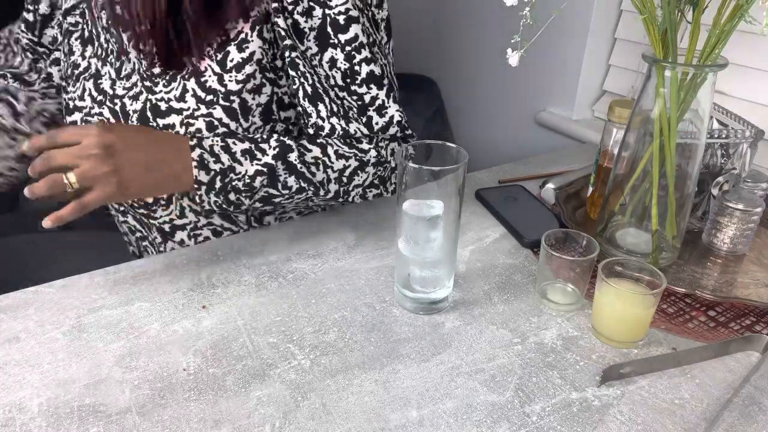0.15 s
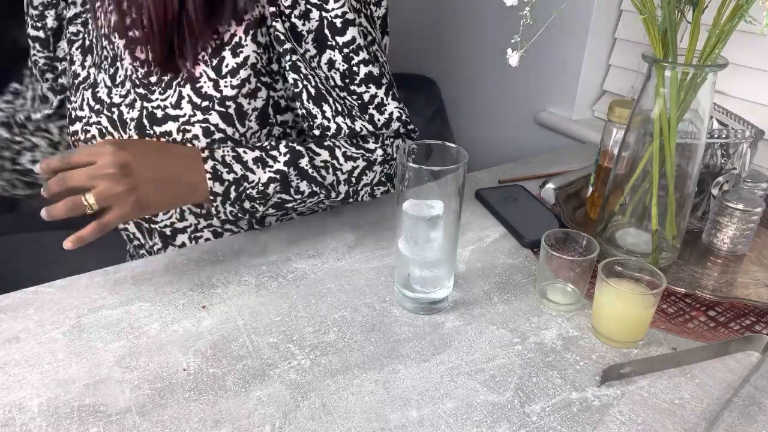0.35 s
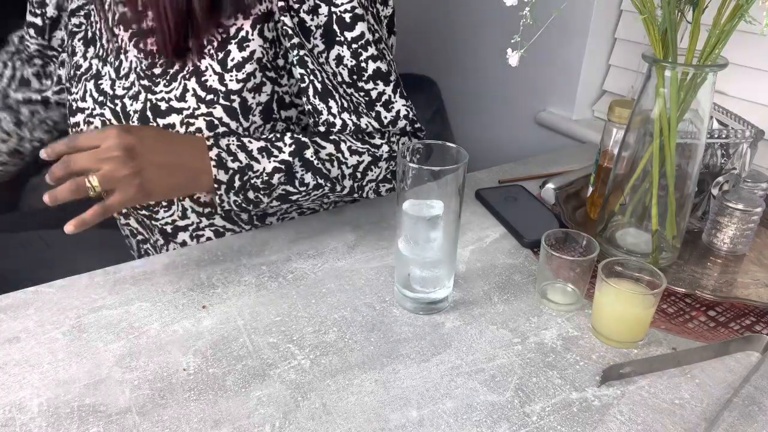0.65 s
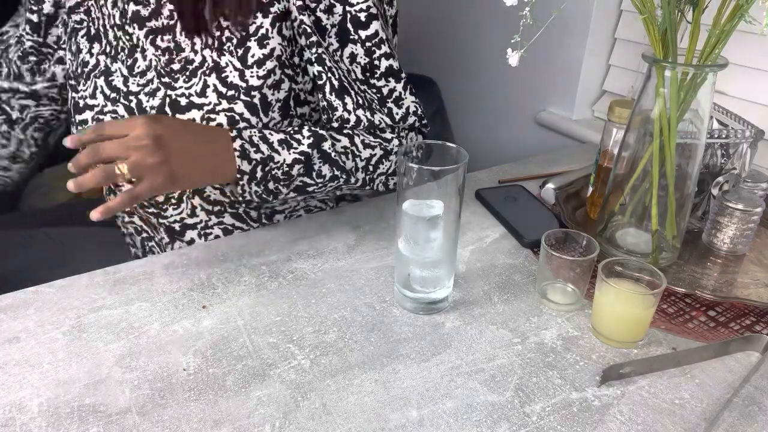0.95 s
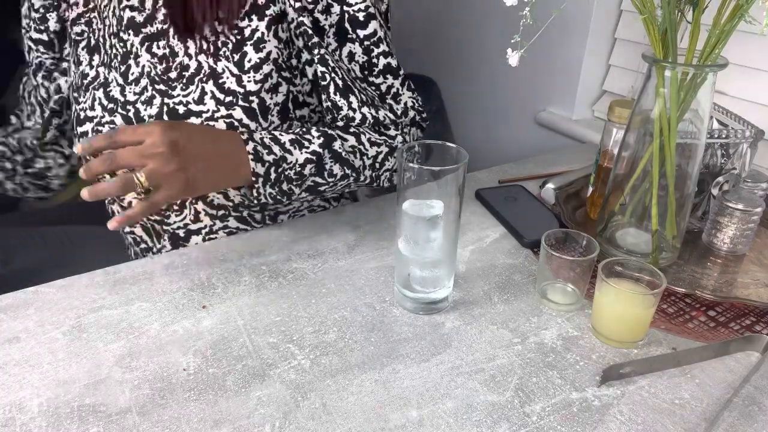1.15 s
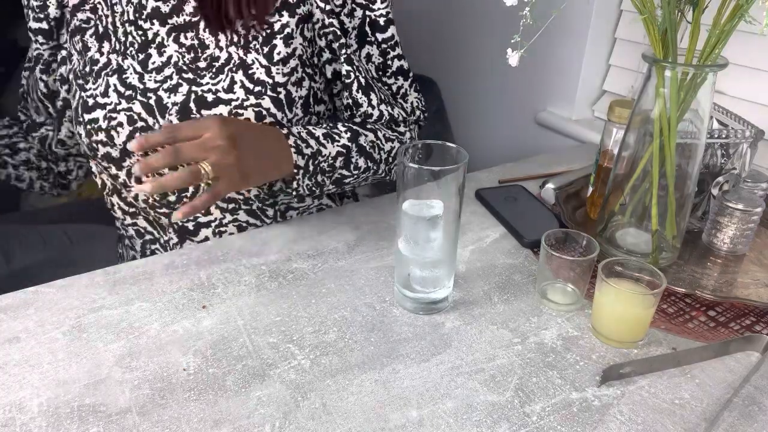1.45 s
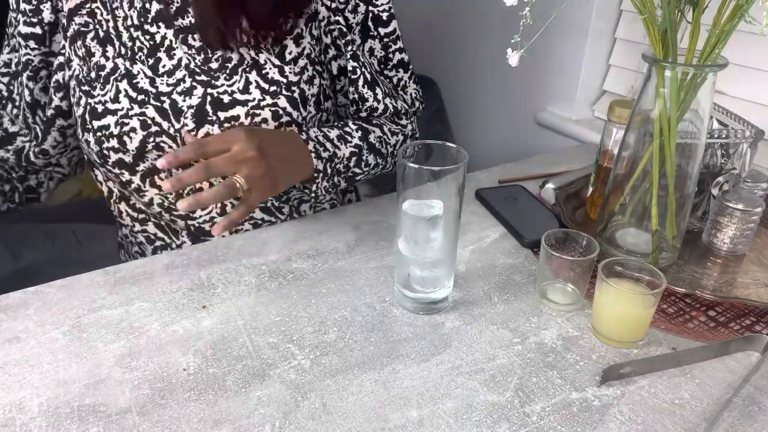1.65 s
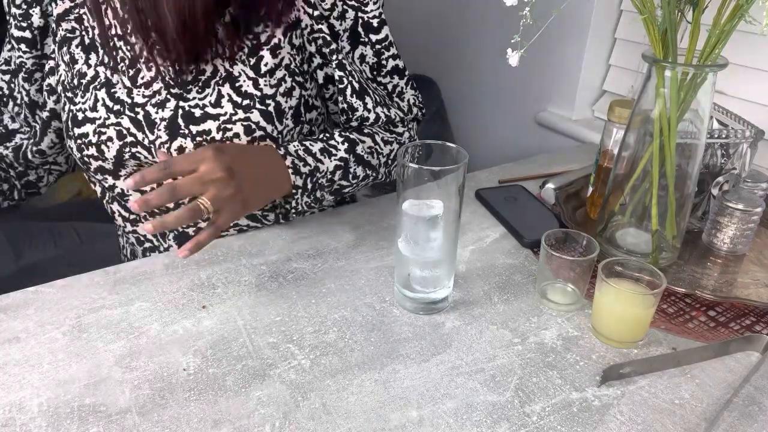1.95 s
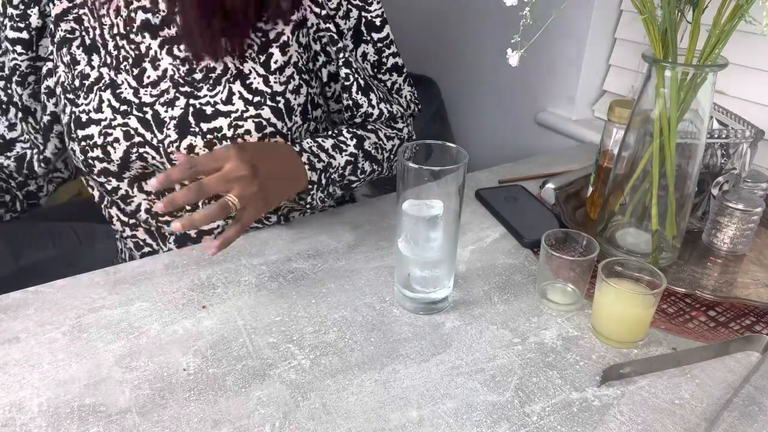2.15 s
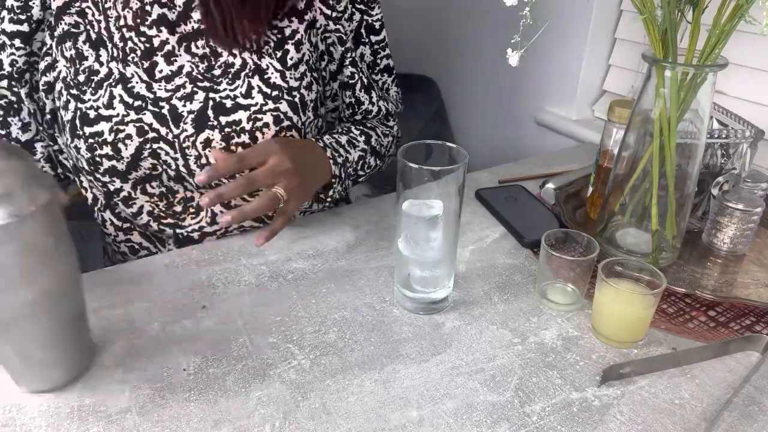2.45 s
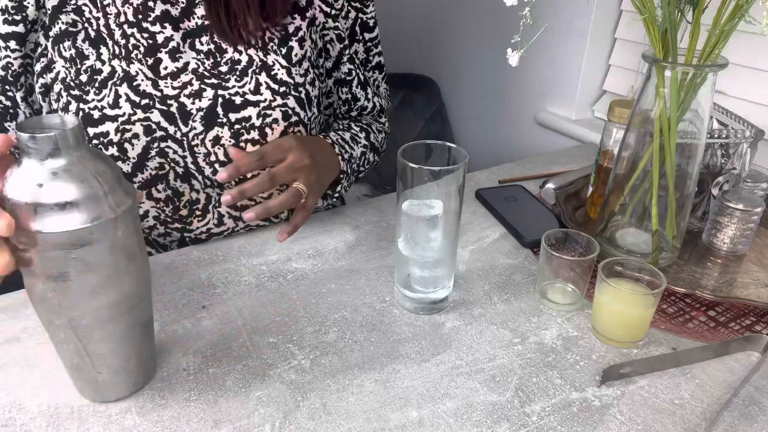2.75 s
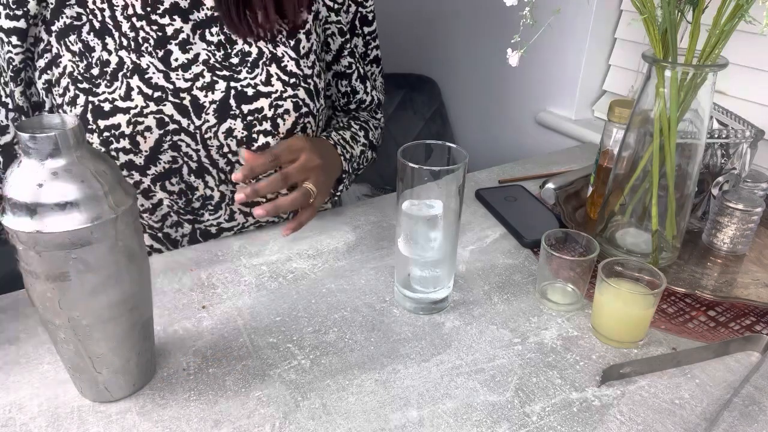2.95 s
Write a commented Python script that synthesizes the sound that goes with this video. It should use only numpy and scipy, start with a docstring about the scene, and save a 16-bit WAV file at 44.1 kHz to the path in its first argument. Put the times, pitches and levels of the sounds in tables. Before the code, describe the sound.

Ice cubes crack and clatter rapidly inside a steel cocktail shaker, stop with a dull knock and faint settling, then the shaker knocks onto a table and rocks briefly; small dry room, close stereo microphones.

```python
"""In a small room, ice is shaken hard in a steel cocktail shaker: cubes crack as short noise bursts and
ring the shell (dense decaying noise plus clear modes), chips patter and the drink sloshes as small resonances.
The shaking stops with dull modal knocks and the ice settles; put down on a table, the base knocks, rocks and drops.
Soft bumps sway the table's low modes, a gliding sine groans briefly, and shaped noise makes the table rumble,
the rustle of a sleeve and the background hiss."""
import sys
import numpy as np
from scipy import signal
from scipy.io import wavfile

SR = 44100
rng = np.random.default_rng(int(sys.argv[2]) if len(sys.argv) > 2 else 0)


def to_wav(sig):
    """Store sig (one row per channel, or 1-D mono) as 16-bit WAV at the path in sys.argv[1].

    Samples outside -1..1 are clipped; the rate is SR.
    """
    pcm = np.clip(np.atleast_2d(sig), -1, 1) * 32767
    pcm = np.round(pcm).astype(np.int16)
    wavfile.write(sys.argv[1], SR, pcm.T)  # frames by channels


N = 136710
TIME = np.arange(N) / SR  # seconds

# Ice striking the wall. Each row: start in seconds, relative crack level in dB, crack pitch in Hz,
# relative level of the shell ring in dB.
ICE_STRIKES = [(0.0929, -13.5, 4070, -23.5), (0.1265, -11.5, 4840, -19), (0.2073, -14, 7140, -33),
               (0.22, -17, 5150, -15), (0.238, -12, 9600, -36.5), (0.2564, -8, 6460, -20.5),
               (0.3767, -18.5, 4700, -35), (0.5018, -16, 5700, -12), (0.5037, -7, 5850, -25.5),
               (0.518, -18.5, 5360, -32.5), (0.5527, -8.5, 6900, -20.5), (0.637, -14.5, 6100, -13),
               (0.7025, -53.5, 5000, -31.5), (0.756, -15.5, 5900, -30.5), (0.767, -9.5, 5270, -31.5),
               (0.8851, -13, 6560, -26), (0.902, -11.5, 4760, -15.5), (1.0328, -23, 9500, -17),
               (1.0371, -14, 4320, -48), (1.0938, -21.5, 5600, -19.5), (1.1603, -16.5, 5200, -13.5),
               (1.165, -13.5, 5500, -26), (1.244, -53, 4900, -17), (1.3026, -16.5, 6000, -15),
               (1.3258, -8.5, 4180, -27.5), (1.364, -27, 5350, -23.5), (1.414, -34.5, 5300, -25.5),
               (1.4957, -25.5, 5500, -24), (1.6687, -31, 6750, -66), (1.7774, -37, 6850, -39.5)]
# Dense modes of the steel shell. Each row: frequency in Hz, relative density in dB per Hz.
SHELL_SPECTRUM = [(150, -38.5), (350, -23.5), (800, -25.5), (1150, -7.5), (1900, -12), (3000, -6),
                  (4400, -1.5), (7000, -6), (10000, -4.5), (13000, -5.5), (16000, -32.5)]


def from_db(db):
    """Amplitude gain is ten to the power of decibels over twenty."""
    return 10 ** (np.asarray(db) / 20)


def rms_one(x):
    """Normalisation: divide by the root mean square, which then is 1."""
    return x / np.sqrt(np.mean(x ** 2) + 1e-20)


def level(rows):
    """Envelope: gain over time, linear in dB between (s, dB) rows and held beyond the ends."""
    return from_db(np.interp(TIME, *np.transpose(rows)))


def at_hz(points, hz):
    """Interpolation of a table on a logarithmic frequency axis."""
    table_hz, values = np.transpose(points)
    return np.interp(np.log(hz), np.log(table_hz), values)


def clicks(times, db):
    """Impulsive excitation: one single-sample click per event."""
    out = np.zeros(N)
    samples = np.clip((np.atleast_1d(times) * SR).astype(int), 0, N - 1)
    np.add.at(out, samples, from_db(db))
    return out


def soften(x, hz, order=2):
    """Contact compliance: a soft contact passes only the lows."""
    low_pass = signal.butter(order, min(hz, SR / 3), fs=SR, output="sos")
    return signal.sosfilt(low_pass, x + 1e-18)


def high_pass(x, hz, order=2):
    """High-pass filtering: components below the corner are weakened."""
    return signal.sosfilt(signal.butter(order, hz, "high", fs=SR, output="sos"), x)


def ring(x, hz, t60):
    """Damped resonance: a unit click sets off a decaying sine of initial height 1."""
    r = from_db(-60 / (t60 * SR))  # decay per sample
    w = 2 * np.pi * hz / SR
    return signal.lfilter([0, np.sin(w)], [1, -2 * r * np.cos(w), r * r], x + 1e-18)


def struck(force, modes):
    """Modal radiation: a body answers a force with its modes and radiates little below them."""
    return sum(from_db(db) * high_pass(ring(force, hz, t60), hz / 2, order=1) for hz, db, t60 in modes)


def noise(spectrum, t60s=None, patchy_db=0):
    """Band-wise partly coherent stereo noise: steady at rms 1, or a tail starting at rms 1 and dying by band."""
    # Each row: frequency in Hz, left-right correlation from 0 to 1.
    likeness = [(100, 0.94), (400, 0.57), (1000, .45), (3000, 0.12), (12000, 0.32)]
    size = N if t60s is None else SR // 2
    edges = 28 * 2 ** (np.arange(29) / 3)  # third octaves
    out, start = 0, 0
    white = rng.standard_normal((2, 2, size + SR // 10))  # the extra tenth lets the filters settle
    for k, (low, high) in enumerate(zip(edges, edges[1:])):
        band_pass = signal.butter(2, [low, high], "band", fs=SR, output="sos")
        mid, side = signal.sosfilt(band_pass, white[k % 2])[:, -size:]
        hz = np.sqrt(low * high)
        alike = np.clip(at_hz(likeness, hz), 0, 1)
        stereo = np.sqrt(1 + alike) * mid + np.sqrt(1 - alike) * side * [[1], [-1]]
        band = from_db(at_hz(spectrum, hz) + patchy_db * rng.uniform(-1, 1)) * stereo
        start = start + band
        if t60s is not None:
            band = band * from_db(-60 * TIME[:size] / at_hz(t60s, hz))
        out = out + band
    return out / start.std()


def through(x, response):
    """Convolution: every sample of a sound sets off the stereo response."""
    return signal.fftconvolve(np.atleast_2d(x), response, axes=1)[:, :N]


def room_response():
    """Reverberation: a diffuse tail of decaying noise, scaled to unit energy per channel on average."""
    # Each row: frequency in Hz, relative density in dB per Hz.
    spectrum = [(5000, 4.5), (15000, -5)]
    # Each row: frequency in Hz, decay time t60 in seconds.
    decay = [(5000, 0.14), (14000, 0.066)]
    tail = noise(spectrum, decay)
    return tail / np.sqrt(np.sum(tail ** 2) / 2)


def wall_spots():
    """Modal density: the shell's crowded modes act as decaying noise, coloured anew at eight spots of the wall."""
    # Each row: frequency in Hz, decay time t60 in seconds.
    decay = [(500, 0.083), (4000, 0.13), (14000, 0.077)]
    return [noise(SHELL_SPECTRUM, decay, patchy_db=7.5) for _ in range(8)]


def clack_response():
    """Modal density: the clack of the steel base is a short decaying noise."""
    # Each row: frequency in Hz, relative density in dB per Hz.
    spectrum = [(300, -4.5), (1200, 7.5), (2500, -8.5), (4500, -13.5), (7000, -22), (14000, -26.5)]
    # Each row: frequency in Hz, decay time t60 in seconds.
    decay = [(1000, 0.17), (10000, 0.26)]
    return noise(spectrum, decay)


def on_wall(times, db, spots):
    """Position-dependent excitation: successive blows ring different spots of the wall."""
    count = len(spots)
    return sum(through(clicks(times[k::count], db[k::count]), spot) for k, spot in enumerate(spots))


def shell_modes(times, db, spread_db=4):
    """Modal excitation: every strike shares its force among the shell's clearest modes in a new way."""
    # Each row: frequency in Hz, relative level in dB, decay time t60 in seconds.
    modes = [(1081, -19.5, .15), (2885, -9, .17), (3460, -10, .17), (4020, 0, .2), (4500, -4, 0.1),
             (4084, 0, 0.13), (7220, -2.5, 0.081)]
    chance = spread_db * rng.standard_normal((len(times), len(modes)))
    return sum(ring(clicks(times, db + mode_db + chance[:, k]), hz, t60)
               for k, (hz, mode_db, t60) in enumerate(modes))


def room_floor():
    """Stationary noise: a faint steady background hiss."""
    # Each row: frequency in Hz, relative density in dB per Hz.
    spectrum = [(40, -0.5), (150, -9.5), (350, 1), (800, -8), (3000, -15), (15000, -40)]
    return from_db(-69) * noise(spectrum)


def rumble():
    """Shaped noise: the table rumbles under the moving arms."""
    # Each row: time in seconds, relative level in dB.
    loudness = [(0, -48), (1.4, -52.5), (2.25, -64), (2.4, -42), (2.8, -59.5), (3.1, -46.5)]
    # Each row: frequency in Hz, relative density in dB per Hz.
    spectrum = [(30, 1.5), (65, -1.5), (100, 10), (135, 4.5), (190, -16), (400, -19.5), (1500, -52.5)]
    return level(loudness) * noise(spectrum)


def clinks():
    """Random impacts: cubes meet, each time ringing at a new pitch with a separate phase on either side."""
    per_s, low_hz, high_hz, t60_s = 260, 2297, 7530, 0.035
    out, t = np.zeros((2, N + SR)), TIME[:SR // 10]
    for when, pitch, size, *phases in rng.random((int(per_s * N / SR), 5)):
        hz = low_hz * (high_hz / low_hz) ** pitch
        i = int(when * N)
        tone = np.sin(2 * np.pi * (hz * t + np.c_[phases]))
        out[:, i:i + len(t)] += tone * from_db(-12 * size - 60 * t / t60_s)
    return rms_one(out[:, :N])


def tumble(spots):
    """Poisson-like impacts: chips patter on the shell in uneven clumps, among clinking cubes."""
    # Each row: time in seconds, relative level in dB.
    loudness = [(0, -26), (.32, -26.5), (.45, -27), (.6, -28.5), (.68, -28), (.83, -25), (.96, -31),
                (.99, -24.5), (1.08, -33), (1.12, -25), (1.22, -26), (1.38, -39), (1.47, -47), (1.53, -34),
                (1.68, -58), (1.93, -56.5), (2.17, -78.5)]
    chips_per_s, chip_spread_db = 450, 5.5
    clumps_per_s, clump_db = 45, 4
    clink_db, modes_db = -8, -9
    when, chance = rng.random((2, N))
    born = when < chips_per_s / SR
    size = np.minimum(-np.log(1 - chance), 3.5)  # exponential, capped
    s, db = TIME[born], chip_spread_db * size[born]
    knots = np.arange(0, N / SR, 1 / clumps_per_s)
    db = db + np.interp(s, knots, clump_db * rng.uniform(-1, 1, len(knots)))
    patter = rms_one(on_wall(s, db, spots))
    modes = rms_one(shell_modes(s, db))
    return level(loudness) * (patter + from_db(clink_db) * clinks() + from_db(modes_db) * modes)


def grains(strengths, low_hz, high_hz, cycles, count=18):
    """Resonator bank: clicks are dealt at random to short resonances spread in pitch."""
    dealt = rng.integers(0, count, N)
    pitches = np.geomspace(low_hz, min(high_hz, SR / 2.2), count)
    return sum(ring(strengths * (dealt == k), hz, cycles / hz) for k, hz in enumerate(pitches))


def slosh(room):
    """Bubble resonance: bubbles in the drink ring at scattered pitches, each dying 60 dB in 12 cycles."""
    # Each row: time in seconds, relative level in dB.
    loudness = [(1.2, -49.5), (1.25, -35), (1.3, -52.5), (1.66, -45), (1.76, -78), (1.92, -46), (1.99, -61),
                (2.07, -48), (2.2, -75), (2.4, -105)]
    bubbles_per_s, low_hz, high_hz = 900, 404, 2580
    born = (rng.random(N) < bubbles_per_s / SR) * rng.standard_normal(N)
    bubbles = grains(born, low_hz, high_hz, cycles=12)
    return level(loudness) * rms_one(bubbles + 0.5 * through(bubbles, room))


def cracks():
    """Brittle fracture: each strike is a brief noise burst with its own pitch band and a splintery top."""
    rise_s, t60_s = 0.00096, 0.0074
    scatter = 0.77  # share of a crack's power that differs between the sides
    edge_ratio = 1 + 0.91 / 2  # band edges lie this factor below and above the pitch
    splinter_db, crack_db = -10, -1.5
    out, t = np.zeros((2, N + SR)), TIME[:SR // 40]
    shape = (1 - np.exp(-t / rise_s)) * from_db(-60 * t / t60_s)
    for s, db, hz, _ in ICE_STRIKES:
        white = rng.standard_normal((3, len(t)))
        raw = shape * (np.sqrt(1 - scatter) * white[0] + np.sqrt(scatter) * white[1:])
        edges = [hz / edge_ratio, min(hz * edge_ratio, SR / 2.2)]
        pitched = signal.sosfilt(signal.butter(2, edges, "band", fs=SR, output="sos"), raw)
        crack = pitched + from_db(splinter_db) * high_pass(raw, hz / 2, order=1)
        onset_rms = crack[:, :SR // 500].std()  # over the first 2 ms
        i = int(s * SR)
        out[:, i:i + len(t)] += crack / onset_rms * from_db(db + crack_db)
    return out[:, :N]


def ice(spots, room):
    """Impact excitation: cubes crack against the wall, ring the shell and now and then ping the cap."""
    # Cubes catching the cap. Each row: start in seconds, relative level in dB.
    ping_rows = [(0.047, -23), (0.164, -19.5), (.552, -23), (.704, -25), (.826, -21.5), (1.16, -28)]
    # Each row: frequency in Hz, relative level in dB, decay time t60 in seconds.
    cap_modes = [(5135, 0, .11), (5230, -1, .1)]
    crack_room_db, shell_db, modes_db = -6, -0.5, -13
    s, _, _, ring_db = np.transpose(ICE_STRIKES)
    crack = cracks()
    rings = on_wall(s, ring_db + shell_db, spots) + shell_modes(s, ring_db + modes_db)
    catches = clicks(*np.transpose(ping_rows))
    pings = sum(from_db(db) * ring(catches, hz, t60) for hz, db, t60 in cap_modes)
    return crack + from_db(crack_room_db) * through(crack, room) + rings + pings


def snaps():
    """Fracture without resonance: splitting chips give very short bright ticks and leave the shell silent."""
    # Each row: start in seconds, relative level in dB.
    snap_rows = [(0.114, -9), (0.1804, -9), (0.207, -15), (0.4803, -13.5), (0.612, -14), (.866, -11),
                 (1.033, -14), (1.057, -3.5)]
    t60_s, low_hz = 0.0039, 5500
    t = TIME[:SR // 100]
    burst = rng.standard_normal((2, len(t))) * from_db(-60 * t / t60_s)
    burst = high_pass(burst, low_hz)
    return through(clicks(*np.transpose(snap_rows)), 2 * burst / np.abs(burst).max())


def thumps(room, clack):
    """Modal response of a held body: dull knocks on the shaker leave its wall free to ring."""
    # Each row: start in seconds, relative level in dB, contact brightness (low-pass corner) in Hz.
    thump_rows = [(1.519, -10.5, 1920), (1.529, -2.5, 437), (1.575, -20, 1840)]
    # Each row: frequency in Hz, relative level in dB, decay time t60 in seconds.
    modes = [(351, -8, 0.06), (412, -11, .08), (508, -7.5, 0.05), (626, -3.5, 0.028), (951, 2.5, 0.012),
             (1356, -1.5, 0.012)]
    room_db, clack_db = -4.5, -20.5
    force = sum(soften(clicks(s, db), hz, order=3) for s, db, hz in thump_rows)
    body = struck(force, modes)
    s, db, _ = np.transpose(thump_rows)
    return body + from_db(room_db) * through(body, room) + through(clicks(s, db + clack_db), clack)


def bumps():
    """Low-mode excitation: soft pushes set the lowest modes of the table top swaying."""
    # Each row: start in seconds, relative level in dB.
    bump_rows = [(1.522, -17), (2.023, -42.5), (2.112, -24), (2.503, -27.5), (2.743, -40.5), (2.841, -41.5),
                 (2.951, -36), (3.077, -34)]
    # Each row: frequency in Hz, relative level in dB, decay time t60 in seconds.
    sway_modes = [(85, -7, 0.053), (125, -11.5, 0.23), (148.8, 1.5, 0.16)]
    force = soften(clicks(*np.transpose(bump_rows)), hz=167)
    return sum(from_db(db) * ring(force, hz, t60) for hz, db, t60 in sway_modes)


def settling():
    """Light impacts: loose cubes tap the wall faintly, with a short ring."""
    # Each row: start in seconds, relative level in dB.
    taps = [(1.713, -42.5), (1.837, -50), (1.918, -50), (1.95, -47), (2.049, -59), (2.096, -53),
            (2.443, -55), (2.459, -69)]
    t60_s = 0.038
    return through(clicks(*np.transpose(taps)), noise(SHELL_SPECTRUM, [(1000, t60_s)]))


def knocks(room, clack):
    """Force-dependent impact: the base excites the table's modes, a tail and a clack that grows with force."""
    # Each row: start in seconds, relative level in dB, contact brightness (low-pass corner) in Hz,
    # lingering share in dB.
    knock_rows = [(2.111, -31.5, 698, 1.5), (2.319, -40, 787, 6), (2.496, 0, 900, -10),
                  (2.508, -13, 592, -6), (2.616, -23, 797, -1.5)]
    # Modes of table and shaker base. Each row: frequency in Hz, relative level in dB, t60 in seconds.
    table_modes = [(300, -20.5, .035), (367, -2, 0.073), (451, -4.5, .05), (698, -4, 0.012),
                   (784, -5.5, 0.023), (900, -3, 0.019), (1510, -9, .02)]
    low_hz = 240  # the light base hardly moves the table below this
    clack_db, clack_growth = -20, 1.1  # level at 0 dB of force; dB more per dB of force
    blows = [struck(soften(clicks(s, db), hz, order=3), table_modes) for s, db, hz, _ in knock_rows]
    blows = high_pass(np.array(blows), low_hz)
    s, db, _, tail_db = np.transpose(knock_rows)
    tail = through(from_db(tail_db) @ blows, room)
    return sum(blows) + tail + through(clicks(s, clack_db + clack_growth * db), clack)


def groan():
    """Frequency glide: a short low sine slides upwards, as of something dragged on the table."""
    # Each row: time in seconds, pitch in Hz, relative level in dB.
    glide = [(2.296, 69.2, -48), (2.345, 105, -32), (2.361, 147.6, -24), (2.4, 152, -37), (2.43, 140, -66)]
    s, hz, db = np.transpose(glide)
    tone = np.sin(2 * np.pi * np.cumsum(np.interp(TIME, s, hz)) / SR)
    return tone * from_db(np.interp(TIME, s, db)) * (TIME > s[0]) * (TIME < s[-1])


def rocking():
    """Rolling contact: the rim makes a quick run of small touches, then the base drops flat and rings."""
    # Each row: time in seconds, relative level in dB.
    loudness = [(2.51, -55), (2.535, -32.5), (2.6, -29), (2.625, -33), (2.7, -71)]
    # Each row: frequency in Hz, relative level in dB, decay time t60 in seconds.
    rim_modes = [(377, -2, 0.13), (436.6, 0, .11), (756, 0.5, 0.029), (910, 0, 0.03)]
    # The drop: start in seconds, relative level in dB.
    base_drop = (2.617, -18.5)
    touches_per_s = 500
    touches = (rng.random(N) < touches_per_s / SR) * rng.choice([-1, 1], N)
    roll = sum(from_db(db) * ring(touches, hz, t60) for hz, db, t60 in rim_modes)
    return level(loudness) * rms_one(roll) + struck(clicks(*base_drop), rim_modes)


def rustle():
    """Friction noise: a sleeve rustles as broad noise with a moving level."""
    # Each row: time in seconds, relative level in dB.
    loudness = [(2.7, -95.5), (2.74, -63.5), (2.79, -76.5), (2.89, -58), (2.99, -55), (3.02, -66.5),
                (3.045, -53), (3.1, -79)]
    # Each row: frequency in Hz, relative density in dB per Hz.
    spectrum = [(200, 15.5), (800, 1.5), (4000, 1.5), (15000, -1)]
    return level(loudness) * noise(spectrum)


def scene():
    """Superposition: shaker, table, sleeve and room add up at a pair of close microphones."""
    left_db, right_db, right_lag_s = -3.5, -0.72, 0.000136
    dip_hz, dip_share = 9050, 0.23  # the left port is duller around this pitch
    spots, room, clack = wall_spots(), room_response(), clack_response()
    background = room_floor() + rustle()
    shaker = tumble(spots) + slosh(room) + ice(spots, room) + snaps() + thumps(room, clack) + settling()
    table = rumble() + bumps() + knocks(room, clack) + groan() + rocking()
    left, right = background + table + shaker
    left = left - dip_share * signal.lfilter(*signal.iirpeak(dip_hz, 2, fs=SR), left)
    right = np.interp(TIME - right_lag_s, TIME, right)
    return np.array([from_db(left_db) * left, from_db(right_db) * right])


def record(dry):
    """Band limiting and clipping: deep bass and very top are lost, and peaks clip at full scale."""
    low_hz, top_hz, stop_hz = 83.7, 13940, 16500  # stop_hz: 60 dB down from here
    heard = high_pass(dry, low_hz, order=3)
    heard = signal.sosfilt(signal.butter(4, top_hz, fs=SR, output="sos"), heard)
    steep = signal.cheby2(14, 60, stop_hz, fs=SR, output="sos")
    return signal.sosfilt(steep, np.clip(heard, -1, 1))


dry = scene()
out = record(dry)
to_wav(out)
```